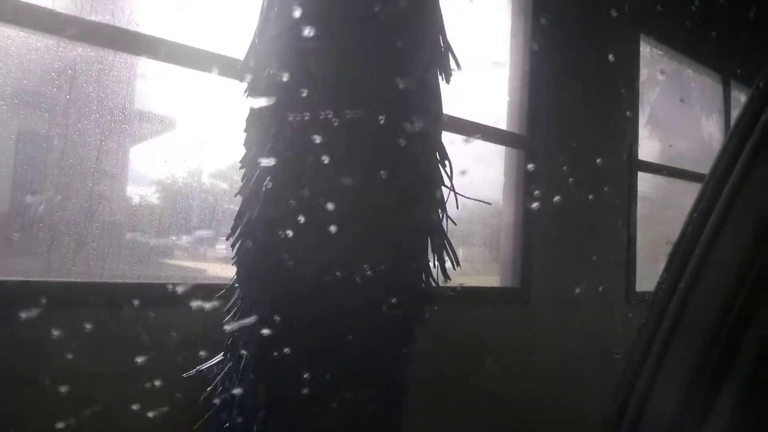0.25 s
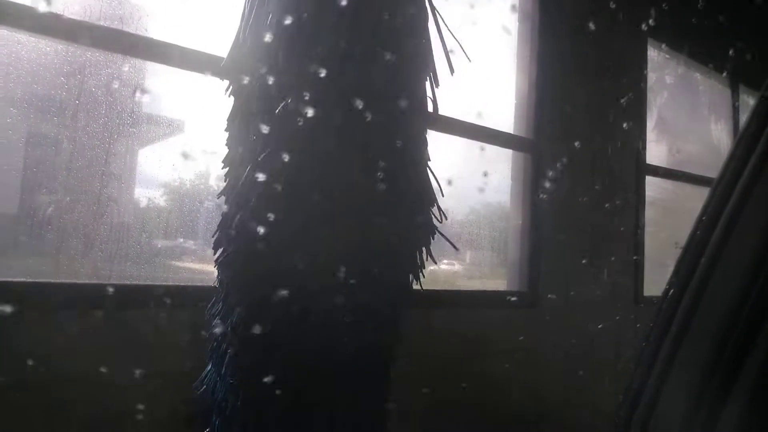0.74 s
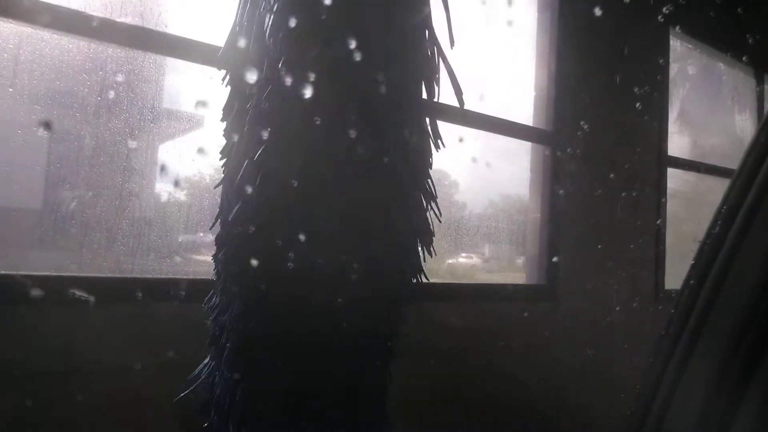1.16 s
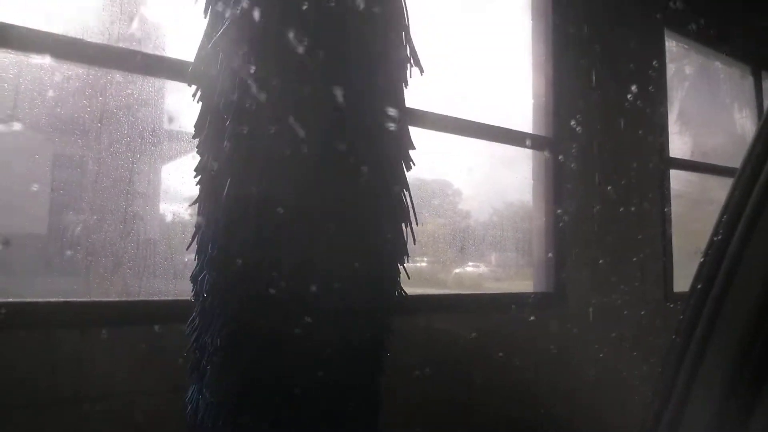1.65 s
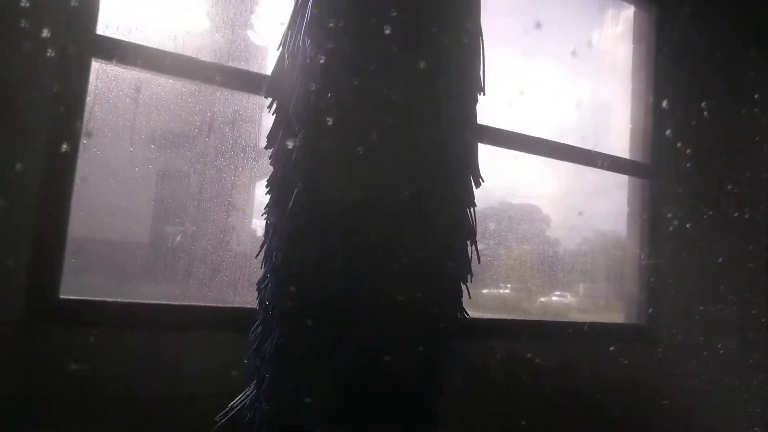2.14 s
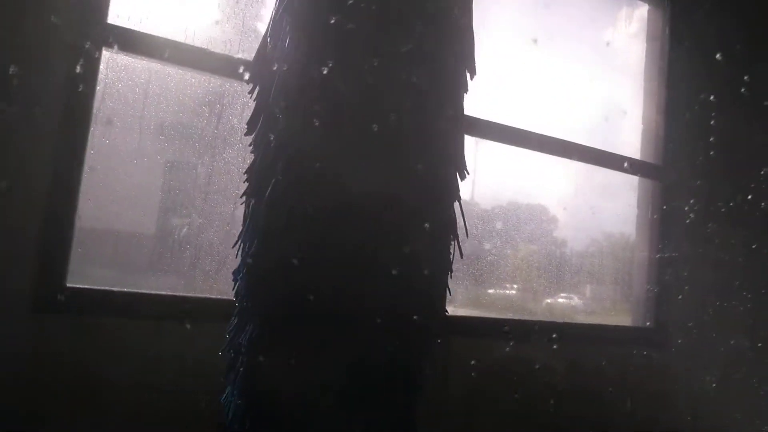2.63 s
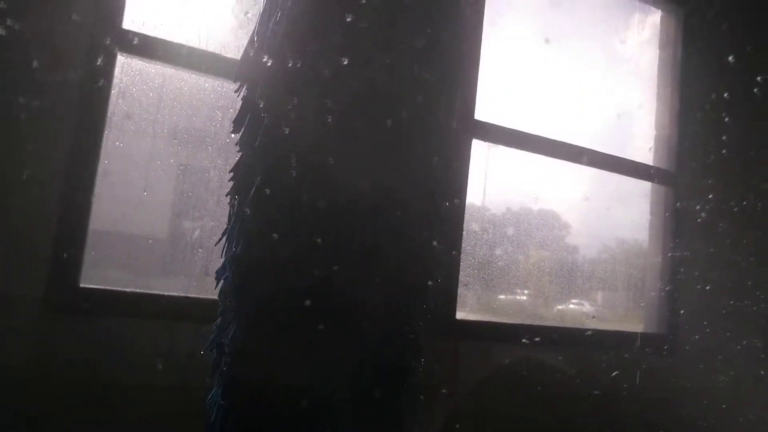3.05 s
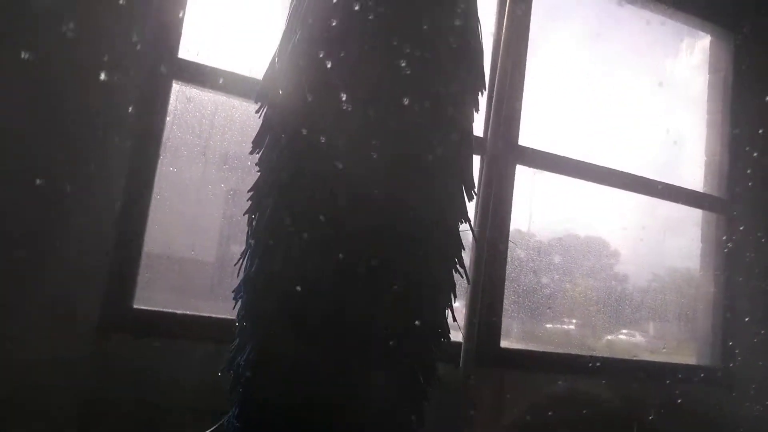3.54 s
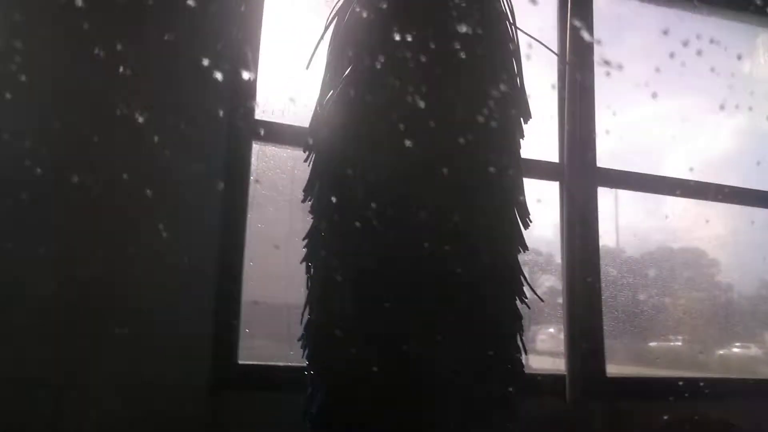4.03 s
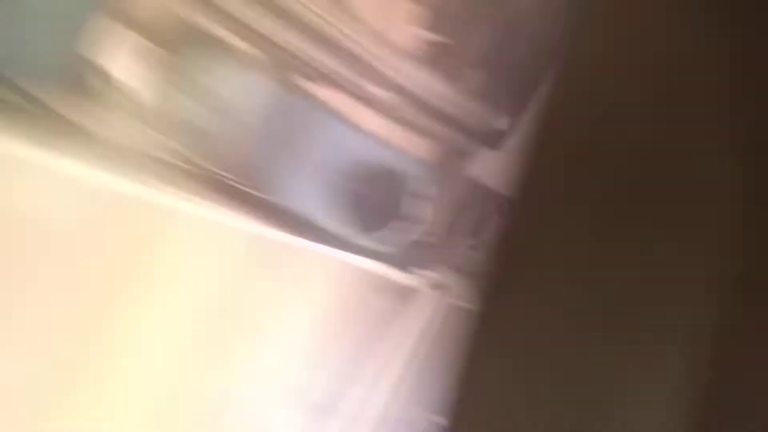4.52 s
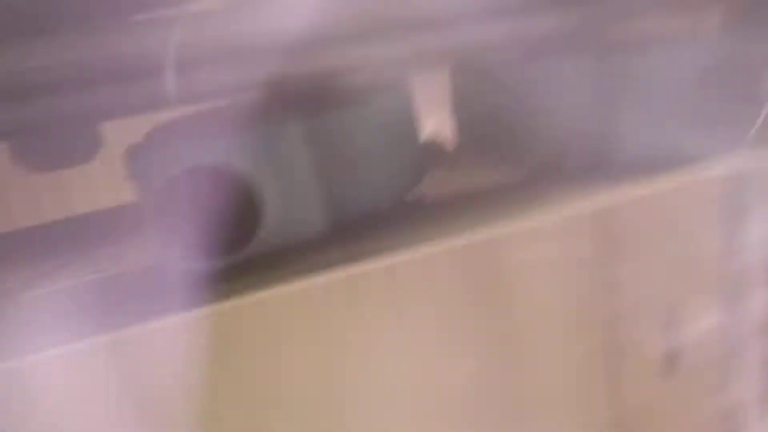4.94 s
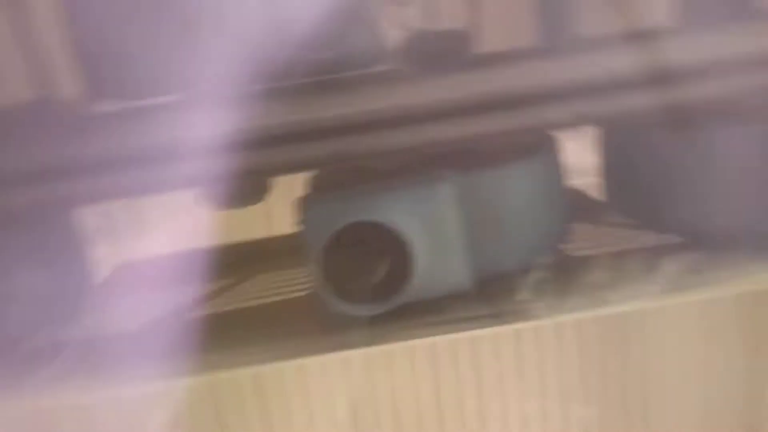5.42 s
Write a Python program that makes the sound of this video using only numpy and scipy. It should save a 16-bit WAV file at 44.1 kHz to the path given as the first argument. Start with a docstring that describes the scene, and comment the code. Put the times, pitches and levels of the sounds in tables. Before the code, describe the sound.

A deep, throbbing roar of car wash dryer blowers runs throughout, heard from inside a closed car, with a faint fan hum buried in it. Uneven gusts pound the roof and doors with low buffeting, notably around 0.3 and 0.7 seconds. A muffled rush comes through the glass, gently swelling about every one and a half seconds, while air hisses at the seals and fine spray sizzles softly on the panes. A few larger drops tick on the glass between 1.6 and 1.9 seconds, and the spray rises slightly around 2 seconds. Heavier low thumps of air land near 3.7 and 4 seconds. At about 4.3 seconds the microphone moves up to the windscreen and everything becomes louder and brighter. A thin, wavering whine passes around 5 seconds, the pane rings in short flares, and the hissing blast strengthens until the end, near 5.7 seconds.

```python
"""A throbbing roar fills a car standing under the dryer blowers of a car wash.
Swinging jets of air pound the body over the drone of the fans; their rush comes through the glass
and hisses at the seals, fine spray blows over the panes and a few drops tick.
Near the end the listener leans up to the windscreen, right under a nozzle: the jet whines,
the pane rings and the blast turns brighter."""
import sys
import numpy as np
from scipy import signal
from scipy.fft import rfft, irfft
from scipy.io import wavfile
from scipy.ndimage import uniform_filter1d

SR = 44100
rng = np.random.default_rng(int(sys.argv[2]) if len(sys.argv) > 2 else 0)


def dump_mix(stems):
    """Bounce the given channels to the path in sys.argv[1] as a 16-bit WAV at rate SR."""
    frames = np.atleast_2d(stems).T  # one column per channel
    limited = np.clip(frames, -1, 1)  # hard clip at full scale
    pcm = np.round(limited * 32767).astype(np.int16)
    wavfile.write(sys.argv[1], SR, pcm)


N = 250047
TIME = np.arange(N) / SR
HZ = np.maximum(np.arange(N // 2 + 1) * SR / N, 1)
SIDES = np.array([[.5], [-.5]])  # half to the left, half against the right

SWEEP_PERIOD_S, SWEEP_HIT_S = 1.647, 0.39  # the nozzles swing; the jets first hit squarely
LEAN_START_S, LEAN_TAKES_S = 4.307, 0.25  # the listener leans from the seat to the windscreen
BLAST_START_S, BLAST_RISE_S = 5.18, 0.34  # the nearest nozzle blasts straight onto the glass
SHEET_MIDDLE_S, SHEET_LENGTH_S = 2, 0.79  # a sheet of water is blown across the glass


def from_db(db):
    """Decibels to gain."""
    return 10 ** (np.asarray(db) / 20)


def unit_rms(x):
    """Scale to unit power."""
    return x / np.sqrt(np.mean(x ** 2) + 1e-20)


def ramp(start_s, takes_s):
    """A steady move from 0 to 1."""
    return np.clip((TIME - start_s) / takes_s, 0, 1)


def swell(middle_s, length_s):
    """A bell curve that rises to 1 and fades."""
    return np.exp(-(2 * (TIME - middle_s) / length_s) ** 2)


def drift(rate_hz):
    """A slow random wander of unit power."""
    return unit_rms(irfft(rfft(rng.standard_normal(N)) / (1 + (HZ / rate_hz) ** 2), N))


def over_time(rows):
    """A breakpoint curve at every sample."""
    return np.interp(TIME, *np.transpose(rows))


def over_pitch(rows):
    """Each column of a table at every frequency."""
    hz, *columns = np.transpose(rows)
    return [np.interp(np.log(HZ), np.log(hz), column) for column in columns]


def ring(clicks, hz, t60_s):
    """A unit click sets a sine of height 1 ringing down."""
    decay, step = from_db(-60 / (t60_s * SR)), 2 * np.pi * hz / SR
    return signal.lfilter([0, np.sin(step)], [1, -2 * decay * np.cos(step), decay ** 2], clicks + 1e-18)


def turbulence(colour, modes=()):
    """Spectra of two unrelated noises of one colour, lifted at the resonances."""
    level_db, = over_pitch(colour)
    for hz, width_hz, lift_db in modes:
        level_db = level_db + lift_db / (1 + (2 * (HZ - hz) / width_hz) ** 2)
    return rfft(rng.standard_normal((2, N))) * from_db(level_db)


def air_level(db, sweep_db=0, roll_db_per_s=0, lean_db=0, blast_db=0):
    """A layer's fader in dB: the nozzles swing, the car rolls on, the listener leans, the blast hits."""
    sweep = np.cos(2 * np.pi * (TIME - SWEEP_HIT_S) / SWEEP_PERIOD_S)
    return (db + sweep_db * sweep + roll_db_per_s * TIME
            + lean_db * ramp(LEAN_START_S, LEAN_TAKES_S) + blast_db * ramp(BLAST_START_S, BLAST_RISE_S))


# Gusts slam the car. Each row: middle and length in seconds, then lift in dB of the buffeting,
# the roar, its bite and the window rush.
GUST_HITS = [(0.28, 0.18, 4, 0, 2.5, 0.79), (0.426, 0.072, 2, 2, -1, 2.1),
             (0.619, 0.053, -3, 3.5, -1.5, 0.5), (0.732, 0.078, 7, 2, -3.5, -0.49),
             (0.95, 0.16, 1, 3, -1, 1.2), (1.383, 0.066, 3.5, 1.2, 2.5, -2.1),
             (1.598, 0.065, 1, 3, -1.5, -0.94), (1.784, 0.064, 2, 1.5, 2.5, 0),
             (1.997, 0.11, 0, 0, 0.5, -0.89), (2.45, 0.19, 0.5, 2.6, -2, 1.3),
             (2.867, 0.17, 0.5, 2.5, -0.5, 0.58), (3.534, 0.19, -3.5, 2.5, 0, 1.3),
             (3.686, 0.11, 8, 1, -0.5, 0), (3.997, 0.054, 11, -1, 0, 0.16), (4.18, 0.21, 4, 0, 0.5, 0.48),
             (4.696, 0.089, 2, 3, -2.5, 0.34), (4.88, 0.14, 7, 0.5, 0.5, -0.26),
             (5.517, 0.13, 3, 0, 4, -0.5)]
# A jet slips off the body. Each row: middle and length in seconds, dip in dB of roar and buffeting,
# dip in dB of the window rush.
GUST_LULLS = [(0, 0.25, 0.5, 0.54), (0.51, 0.066, 1, 0.5), (2.157, 0.11, 2, 1.5), (2.652, 0.19, 0.7, 0.3),
              (3.19, 0.13, 0.5, 1.8), (4.345, 0.1, 0, 1.1)]
def gust_db(layer):
    """One layer's ride in dB as gusts and lulls swell and fade."""
    buffet, roar, bite, rush = sum(np.outer(lifts, swell(s, length)) for s, length, *lifts in GUST_HITS)
    body_dip, rush_dip = sum(np.outer(dips, swell(s, length)) for s, length, *dips in GUST_LULLS)
    rides = dict(buffet=buffet - body_dip, roar=roar - body_dip, bite=bite, rush=rush - rush_dip)
    return rides[layer]


def fan_drone(hz=258.6, waver_hz=3.64, base_db=-40, gust_depth=2.8):
    """The fans hum inside the roar, wavering in the turbulent air and swelling with the gusts."""
    phase = 2 * np.pi * np.cumsum(hz + waver_hz * drift(6.7)) / SR
    return from_db(base_db + gust_depth * gust_db("roar")) * unit_rms(np.sin(phase))


def jet_whine(hz=1770, waver_hz=11, base_db=-41.5, flutter_db=5.5, left_lead_rad=2):
    """The jet whines on the edge of the windscreen as the nozzle passes."""
    phase = 2 * np.pi * np.cumsum(hz + waver_hz * drift(32)) / SR
    tone = unit_rms(np.sin(phase + left_lead_rad * SIDES))
    return from_db(base_db + flutter_db * drift(17)) * swell(middle_s=5, length_s=0.69) * tone


def spray_level():
    """Strength in dB of the blown water; it rises with the sheet, the lean and the blast."""
    near_db = 5 * ramp(LEAN_START_S, takes_s=0.39)
    sheet_db = 2.5 * swell(SHEET_MIDDLE_S, SHEET_LENGTH_S)
    return air_level(-56, roll_db_per_s=-0.55, blast_db=8) + near_db + sheet_db


def droplets(per_s, size_db):
    """Tiny blown droplets land at random, harder when the spray is strong."""
    landed = rng.random(N) < per_s / SR
    sizes_db = spray_level() + size_db + 3 * np.minimum(rng.exponential(1, N), 3)
    return landed * from_db(sizes_db + rng.normal(0, 2.5, (2, N)))


# Large drops hit the glass. Each row: start in seconds, strength in dB, left over right in dB.
DROP_HITS = [(1.658, -30, 2), (1.6832, -15, 5), (1.8082, -26, 2), (1.817, -22.5, 2), (1.832, -34, 0)]
# The ring of a drop's tick. Each row: pitch in Hz, relative level in dB, seconds to fall 60 dB.
TICK_MODES = [(5600, -15, 0.0035), (7600, -14, 0.003), (8500, -9, 0.0045), (11200, -8, 0.003),
              (12500, -6.5, .0022)]
def drops(specks_per_s=2500, splash_db=-23, splash_t60_s=0.1):
    """Large drops tick on the glass and scatter into specks; small droplets tick between them."""
    clicks = droplets(per_s=12, size_db=-1)
    specks = rng.standard_normal((2, N)) * (rng.random(N) < specks_per_s / SR)
    for start_s, strength_db, balance_db in DROP_HITS:
        size = from_db(strength_db + balance_db * SIDES)
        clicks[:, round(start_s * SR)] += size[:, 0]
        splash = (TIME > start_s) * from_db(splash_db - 60 * np.abs(TIME - start_s) / splash_t60_s)
        clicks += size * splash * specks
    return sum((-1) ** k * from_db(db) * ring(clicks, hz, t60_s)
               for k, (hz, db, t60_s) in enumerate(TICK_MODES)) / 2


# The width of the rush. Each row: frequency in Hz, share of the opposite side subtracted from the left,
# the same for the right, its delay in milliseconds.
RUSH_WIDTH = [(700, .5, .5, 0.34), (1160, 0.97, 0.84, 0.46), (1570, 0.89, 0.4, 0.47),
              (1830, 0.52, 0.39, 0.47), (2350, 0.87, 1, 0.44), (2750, 0.95, 0.25, 0.46),
              (3400, 0.58, 0.51, 0.429), (4700, 0.51, 0.38, 0.437), (5700, 0.38, 0.65, 0.435),
              (8000, .08, 0.44, 0.446), (13000, .22, 0.36, 0.451)]
def window_air(colour, flutter_db, balance_db, modes=()):
    """Diffuse rush, widened by taking from each side the delayed other; eddies make it flutter."""
    spectra = turbulence(colour, modes)
    *shares, delay_ms = over_pitch(RUSH_WIDTH)
    shares = np.clip(shares, 0, 1)
    opposite = spectra[::-1] * np.exp(-2j * np.pi * HZ * delay_ms / 1000)
    wide = irfft((spectra - shares * opposite) / np.sqrt(1 + shares ** 2), N)
    return unit_rms(wide * from_db(flutter_db * drift(20) + balance_db * SIDES))


# The sizzle of the spray. Each row: frequency in Hz, relative level in dB.
SPRAY_COLOUR = [(3000, -38), (5300, 3), (6400, -1), (7500, -2), (9000, -3), (11300, -2), (12300, -4.5),
                (14000, -13), (16000, -29)]
def spray():
    """The jets drive fine water over the panes."""
    return from_db(spray_level()) * window_air(SPRAY_COLOUR, flutter_db=0.94, balance_db=0.5)


# The hiss at the seals. Each row: frequency in Hz, relative level in dB.
SEAL_COLOUR = [(1400, -46), (2250, 1.5), (2650, -2.3), (3200, -0.5), (4000, -3), (5000, -4.5), (5800, -13),
               (7000, -16), (11000, -54)]
def seal_hiss():
    """Air hisses at the seals, a little louder as the sheet of water passes."""
    level_db = air_level(-46.5, sweep_db=1, roll_db_per_s=-0.56, lean_db=5.5, blast_db=3)
    level_db += 1.8 * swell(SHEET_MIDDLE_S, SHEET_LENGTH_S)
    return from_db(level_db) * window_air(SEAL_COLOUR, flutter_db=1.2, balance_db=-1.5)


# The thin rush at the windscreen's edge. Each row: frequency in Hz, relative level in dB.
EDGE_COLOUR = [(1800, -45), (2650, -5), (2950, -1), (3080, -3), (3200, -1.5), (3450, -2), (3900, -6.5),
               (4700, -20), (7000, -44)]
# Its resonances. Each row: centre in Hz, width in Hz, lift in dB.
EDGE_PEAKS = [(2984, 65, 7.4), (3200, 98, 3), (3420, 130, 3.8)]
def edge_rush():
    """Air squeezes along the edge of the windscreen, building as the car rolls on."""
    level_db = air_level(-66, roll_db_per_s=4, lean_db=4.5, blast_db=1.5)
    return from_db(level_db) * window_air(EDGE_COLOUR, flutter_db=1.2, balance_db=-1.5, modes=EDGE_PEAKS)


# The jet striking the windscreen. Each row: frequency in Hz, relative level in dB.
PANE_COLOUR = [(900, -16), (1300, -12), (1480, -3.5), (1800, -2.5), (2080, -5), (2300, -8), (2650, -17),
               (4500, -47)]
# The pane's resonances. Each row: centre in Hz, width in Hz, lift in dB.
PANE_MODES = [(1634, 44, 8), (1780, 50, 7.5), (1960, 60, -1), (2120, 100, 9)]
# The ringing flares. Each row: middle in seconds, length in seconds, lift in dB.
PANE_FLARES = [(5.06, 0.065, 4.5), (5.257, 0.1, 6.5), (5.391, 0.026, 9)]
def windscreen_ring():
    """The jet sets the windscreen ringing, in flares when the nozzle catches it."""
    level_db = air_level(-65, sweep_db=1.5, roll_db_per_s=5, lean_db=1.5, blast_db=4)
    level_db += sum(lift_db * swell(s, length) for s, length, lift_db in PANE_FLARES)
    return from_db(level_db) * window_air(PANE_COLOUR, flutter_db=3.3, balance_db=-1.5, modes=PANE_MODES)


# The midrange rush behind the windows. Each row: frequency in Hz, relative level in dB.
GLASS_COLOUR = [(500, -51), (900, -1), (1100, -5), (1300, -1.5), (1600, 2), (1850, 3.5), (2100, 1),
                (2350, -8.5), (2750, -11.5), (4500, -56)]
def glass_rush():
    """The rush of the jets comes through the glass, rising and falling with their swing."""
    level_db = air_level(-37, sweep_db=2, roll_db_per_s=-0.82, lean_db=6, blast_db=-2)
    return from_db(level_db) * window_air(GLASS_COLOUR, flutter_db=1.5, balance_db=-0.2)


def cabin_air(colour, image, modes=(), steady_s=0.125):
    """Low noise in the cabin; standing waves put the two sides out of step."""
    likeness, lead_rad, balance_db = over_pitch(image)
    likeness = np.clip(likeness, 0, 1)
    shared, own = turbulence(colour, modes)
    left = shared * np.exp(1j * lead_rad)
    right = likeness * shared + np.sqrt(1 - likeness ** 2) * own
    air = irfft(np.array([left, right]) * from_db(balance_db * SIDES), N)
    # the blowers run steadily, so slow chance swells are evened out
    power = uniform_filter1d(np.mean(air ** 2, axis=0), int(steady_s * SR))
    return unit_rms(air / np.sqrt(power + 1e-20))


# The low thud of the body. Each row: frequency in Hz, relative level in dB.
BUFFET_COLOUR = [(12, -48), (25, -25), (36, -10.5), (44, -11.5), (55, -4.5), (69, -11), (81, 1), (95, -0.5),
                 (112, -3), (135, -18), (220, -67)]
# The stereo image at the seat, for buffeting and roar. Each row: frequency in Hz, likeness of the sides
# from 0 to 1, left lead in radians, left over right in dB.
SEAT_IMAGE = [(42, 0.95, 4, -7), (92, 0.26, 2, -2), (145, 1, 1.39, 0.5), (243, 0.69, 0.84, 0),
              (320, 0.49, 0.0, 4.5), (417, 0.48, 0.55, 3.5), (628, 0.06, -0.47, 1.5), (770, 0.88, 0.5, 2),
              (1070, 0.93, -0.0, 2)]
def buffeting():
    """Roof and doors heave under the jets and pump the air in the cabin."""
    level_db = air_level(-32.5, roll_db_per_s=0.68, lean_db=-1.5) + gust_db("buffet")
    return from_db(level_db) * cabin_air(BUFFET_COLOUR, SEAT_IMAGE)


# The roar at the seat and at the windscreen. Each row: frequency in Hz, relative level in dB.
SEAT_COLOUR = [(60, -45), (105, -6.5), (125, -3), (205, -4), (250, -1), (300, -5), (385, -5.5), (480, -9),
               (550, -13), (700, -13), (850, -17), (1050, -27.5), (1300, -28), (2200, -87)]
SCREEN_COLOUR = [(60, -55), (100, -24), (120, -2), (205, -1.5), (300, 1), (370, -3.5), (490, -5.5),
                 (600, -8), (760, -9.5), (900, -15), (1080, -19), (1350, -36.5), (2200, -72)]
# The cabin's standing waves at each spot. Each row: centre in Hz, width in Hz, lift in dB.
SEAT_WAVES = [(226.5, 8.6, 3.5), (254.5, 6.1, 4), (386, 7.4, -1.5), (498, 16, 2), (615, 23, 4),
              (725, 35, 3), (894, 26, 3.5)]
SCREEN_WAVES = [(135, 21, 9.4), (182.4, 20, 6.9), (231, 25, 8), (280, 8, 1.1), (420, 30, 2.2),
                (480, 22, 2.8), (585, 37, 4.7), (688.4, 17, 8.2), (819, 22, 3.1), (1000, 18, 3.2),
                (1140, 64, 8.4)]
# The stereo image at the windscreen, with rows as in SEAT_IMAGE.
SCREEN_IMAGE = [(139, 0.96, 2.58, 0.5), (230, 0.32, 1.98, 1.5), (344, 0.16, 1.2, 3), (440, 0.48, 0.69, 1),
                (650, 0.76, 0.25, 0), (1090, 1, 0.1, 0.2)]
# The bite, the upper part of the roar. Each row: time in seconds, lift in dB.
BITE_RIDE = [(0, 1.5), (1.15, -1.4), (1.9, -0.4), (2.65, -0.4), (3.8, 0.5), (4.3, 2.5), (4.8, 0.4),
             (5.2, 1), (5.67, 2)]
# The listener turns. Each row: time in seconds, left over right in dB.
HEAD_TURN = [(0, 1), (3.1, 0.6), (4.5, -2.2), (5.2, 1.5), (5.67, 1)]
def cabin_roar(bite_above_hz=504):
    """The pounded body fills the cabin with a roar; the lean crossfades from seat to windscreen."""
    lean = ramp(LEAN_START_S, LEAN_TAKES_S)
    seat = cabin_air(SEAT_COLOUR, SEAT_IMAGE, SEAT_WAVES)
    screen = cabin_air(SCREEN_COLOUR, SCREEN_IMAGE, SCREEN_WAVES)
    roar = np.sqrt(1 - lean) * seat + np.sqrt(lean) * screen
    bite = irfft(rfft(roar) / (1 + (bite_above_hz / HZ) ** 6), N)
    bite_db = over_time(BITE_RIDE) + gust_db("bite")
    roar += (from_db(bite_db) - 1) * bite  # brighter and duller over time and with the gusts
    level_db = air_level(-20.5, sweep_db=0.24, roll_db_per_s=-0.9234, lean_db=5) + gust_db("roar")
    return from_db(level_db + over_time(HEAD_TURN) * SIDES) * roar


def scene():
    """Everything heard in the cabin; the four window layers ride the gusts together."""
    body = cabin_roar() + buffeting()
    windows = from_db(gust_db("rush")) * (glass_rush() + windscreen_ring() + edge_rush() + seal_hiss())
    return body + windows + spray() + drops() + jet_whine() + fan_drone()


def record(dry):
    """A steep low-pass takes off the very top."""
    cutoff_hz = 14200
    return signal.sosfilt(signal.ellip(12, .1, 90, cutoff_hz, fs=SR, output="sos"), dry)


dry = scene()
out = record(dry)
dump_mix(out)
```